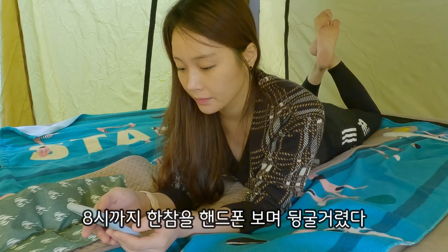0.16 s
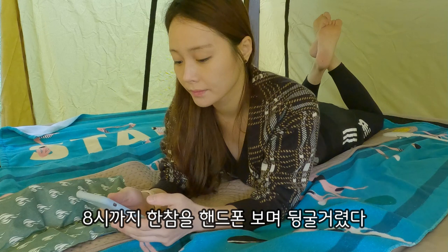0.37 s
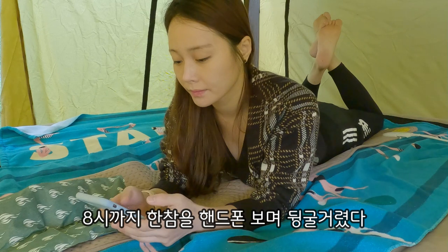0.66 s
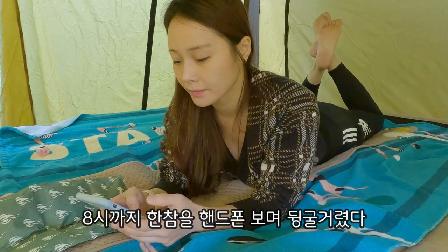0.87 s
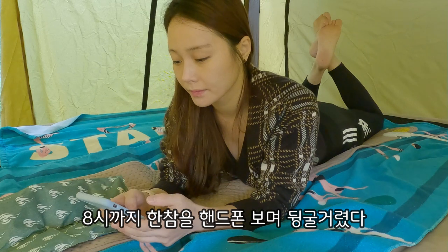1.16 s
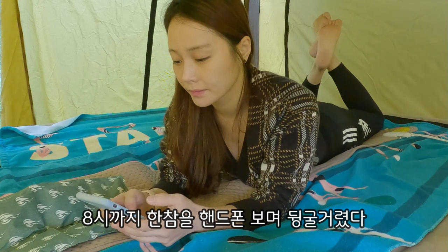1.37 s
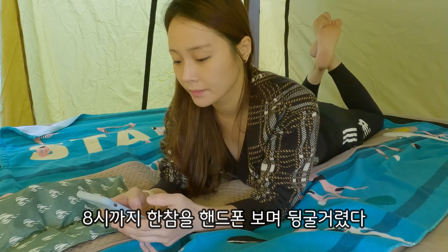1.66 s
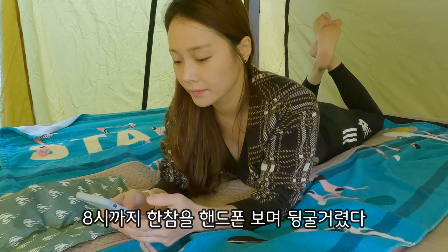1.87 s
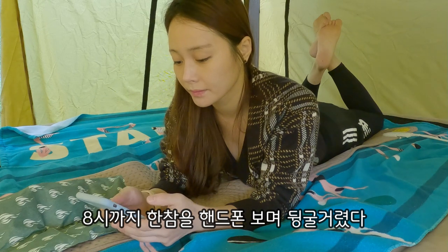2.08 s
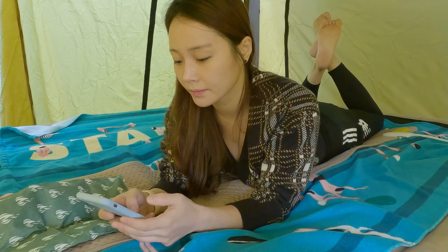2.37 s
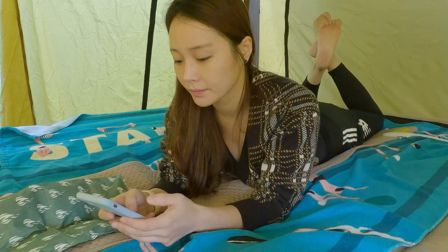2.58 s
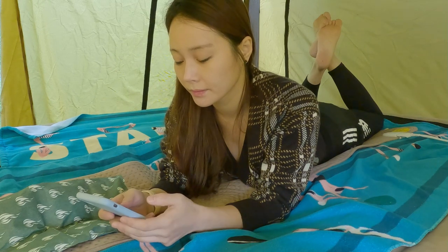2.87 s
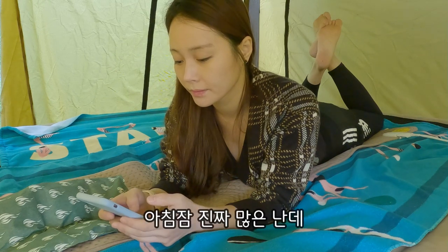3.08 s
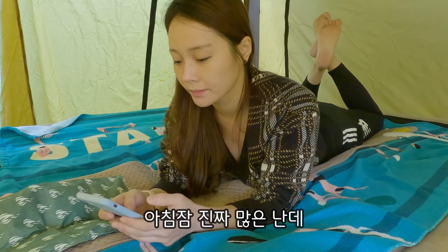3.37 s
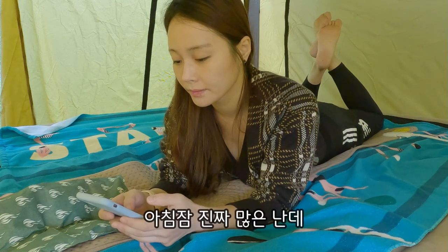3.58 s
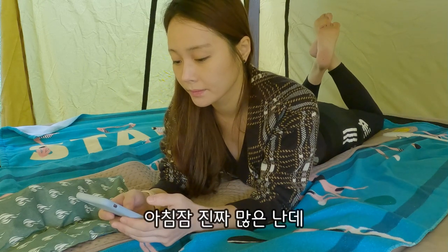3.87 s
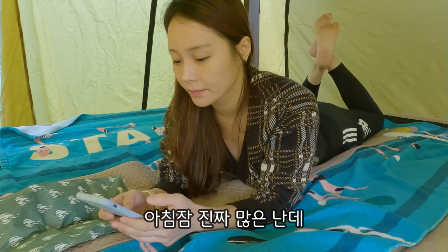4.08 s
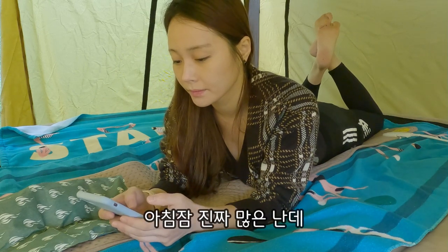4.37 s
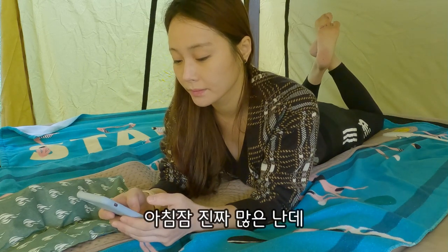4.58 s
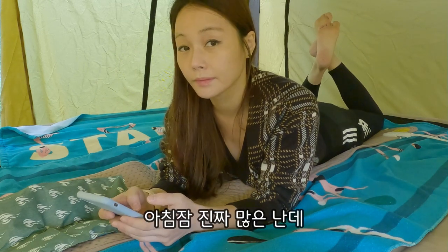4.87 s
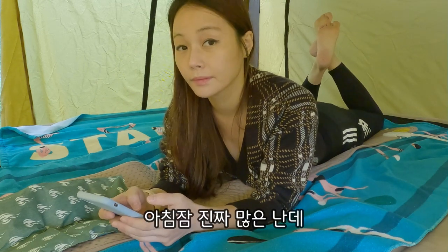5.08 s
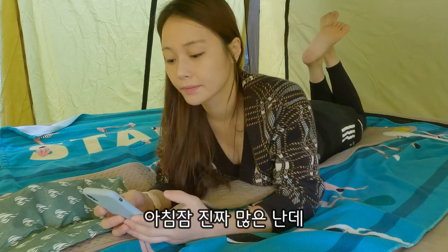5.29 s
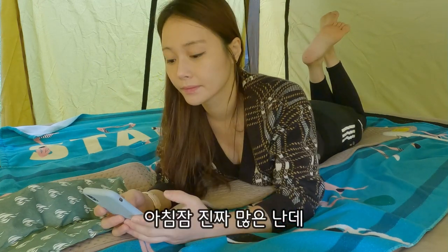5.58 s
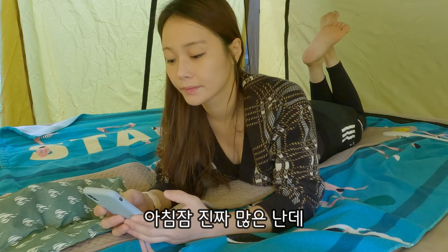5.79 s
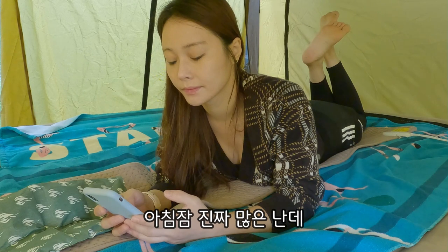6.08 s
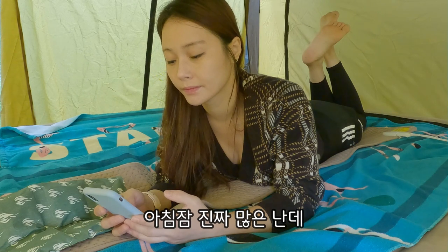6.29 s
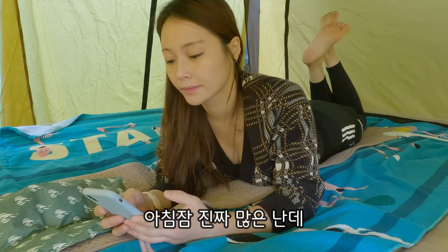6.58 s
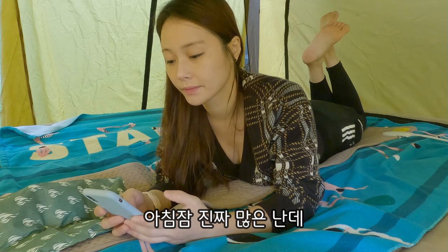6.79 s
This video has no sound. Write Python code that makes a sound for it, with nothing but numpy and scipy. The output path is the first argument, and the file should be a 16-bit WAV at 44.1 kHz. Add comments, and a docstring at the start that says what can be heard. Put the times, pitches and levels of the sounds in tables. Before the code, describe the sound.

A small bird gives eleven short, high, arched chirps among trees, over soft wind rumble and a distant rush, heard from inside a tent.

```python
"""Among trees, heard from inside a tent: a small bird gives eleven arched chirps, whistled on a gliding pitch
with noise around it and scattered by the leaves. A second bird adds two faint notes, ringing from farther off.
A hoarse far call, noise around a sinking pitch, opens the scene and stops abruptly; thin far tones swell later.
Shaped noise makes the soft wind rumble, low drone, distant rush and hiss, and the bedding, which shifts twice
near the end."""
import sys
import numpy as np
from scipy import signal
from scipy.fft import rfft, irfft, next_fast_len
from scipy.io import wavfile
from scipy.ndimage import uniform_filter1d, map_coordinates

SR = 44100
rng = np.random.default_rng(int(sys.argv[2]) if len(sys.argv) > 2 else 0)


def generate_wav(sig):
    """Save sig (samples, or channels by samples) to the path in sys.argv[1] as 16-bit PCM at SR."""
    pcm = np.round(np.clip(np.atleast_2d(sig).T, -1, 1) * 32767).astype(np.int16)
    wavfile.write(sys.argv[1], SR, pcm)


N = 306436  # samples
TIME = np.arange(N) / SR  # s


def amp(db):
    """Decibels to gain."""
    return 10 ** (np.asarray(db) / 20)


def unit(x):
    """Scale to rms 1."""
    return x / np.sqrt(np.mean(x ** 2) + 1e-20)


def curves(rows):
    """One value per sample for each column after the time."""
    s, *cols = np.transpose(rows)
    return [np.interp(TIME, s, c) for c in cols]


def wobble(rate, size=N):
    """A smooth random curve, rate knots a second."""
    knots = rng.standard_normal(size // 8)
    return map_coordinates(knots, [np.arange(size) * rate / SR], mode="mirror")


def filtered(x, response):
    """x times a response of frequency."""
    m = next_fast_len(x.shape[-1] + 8192)
    spectrum = rfft(x, m) * response(np.fft.rfftfreq(m, 1 / SR))
    return irfft(spectrum, m)[..., :x.shape[-1]]


def noise(spectrum, size=N):
    """Noise of rms 1 with the colour of the (frequency [Hz], relative level [dB]) points."""
    f, db = np.transpose(spectrum)
    white = rng.standard_normal(size)
    return unit(filtered(white, lambda hz: amp(np.interp(np.log(hz + 1), np.log(f), db))))


def add(track, s, x):
    """Mix x into the track from time s."""
    part = track[round(s * SR):][:len(x)]
    part += x[:len(part)]


def cycles(hz):
    """Running phase of a moving pitch."""
    return 2 * np.pi * np.cumsum(hz) / SR


# The small bird's chirps: (time [s], nominal length [s], shoulder pitch [Hz], top pitch [Hz],
# level of the rise [dB], level of the fall [dB], harshness [0-1], echo from the leaves re direct [dB])
CHIRP_ROWS = [ (0.676, 0.15, 3944, 5210, -36.5, -55, 0.89, 0),
              (0.941, 0.16, 4155, 5676, -37.5, -47, 0.89, 1.5),
              (1.415, 0.16, 4500, 5330, -35.5, -38.5, 0.57, 0.5),
              (1.527, 0.16, 4344, 5330, -38.5, -40, 0.95, -1.5),
              (2.101, 0.17, 4455, 5560, -41, -42, 0.28, -2.5),
              (2.541, 0.16, 4427, 5590, -41, -42, 0.3, -2.5),
              (3.242, 0.16, 4400, 5440, -41.5, -45, 0.2, -5),
              (3.636, 0.165, 3900, 5130, -41, -38.5, 0.4, -2),
              (3.993, 0.16, 4450, 5590, -40.5, -44, 0, -5.5),
              (4.311, 0.169, 4400, 5760, -50.5, -52.5, 0.05, -1),
              (4.699, 0.17, 4080, 5420, -44.5, -42.5, 0.32, -3)]


def bird(lead_s=0.017, lead_hz=4500, lead_db=-19):
    """Every chirp is led in by a tiny scratchy note, and each scatters anew among the trees."""
    out = np.zeros(N)
    for s, length, shoulder, top, rise_db, fall_db, harsh, echo_db in CHIRP_ROWS:
        call = chirp(length, shoulder, top, rise_db, fall_db, harsh)
        add(out, s, trees(call, echo_db))
        # the lead-in is loudest just as the chirp begins
        n = int(2 * lead_s * SR)
        scratchy_hz = lead_hz * (1 + 0.103 * wobble(1226, size=n))
        lead = np.hanning(n) * np.sin(cycles(scratchy_hz))
        add(out, s - lead_s, trees(np.sqrt(2) * amp(rise_db + lead_db) * lead, echo_db))
    return out


# Colour of the breathy noise around the whistle: (frequency [Hz], relative level [dB])
HOARSE_COLOUR = [(700, -26), (1500, 4.5), (2500, -5), (4300, 9), (5800, -3.5), (6600, -8.5), (8000, -15),
                 (12000, -28), (15500, -45)]
# what harshness does to a chirp: (pure, harshest)
ATTACK_S = (0.012, 0.037)  # a harsh chirp swells more slowly
TOP_SAG_DB = (9.5, 2)  # and holds its level over the top of the arch
HOARSE_DB = (-16, -11)  # with more noise around the whistle
WAVER = (0.014, 0.029)  # and a less steady pitch (share of the pitch)
ATTACK_DEPTH_DB = 20.5  # a chirp starts this far under its full level
FULL_EFFORT_DB, HOARSE_GROWTH = -38, 0.29  # growth: extra dB of hoarseness per dB of effort


def chirp(length, shoulder, top, rise_db, fall_db, harsh, flutter_db=2.0, octave_db=-31, rasp_db=-17):
    """One whistle leaps to a shoulder, climbs to a rounded top and drops; it is loudest on the slopes."""
    attack_s = np.interp(harsh, [0, 1], ATTACK_S)
    sag_db = np.interp(harsh, [0, 1], TOP_SAG_DB)
    hoarse_db = np.interp(harsh, [0, 1], HOARSE_DB)
    waver = np.interp(harsh, [0, 1], WAVER)
    t = np.arange(int(1.05 * length * SR)) / SR
    u, n = t / length, len(t)  # u: share of the nominal length

    arch_u = [0, 0.03, 0.08, 0.17, 0.3, 0.45, 0.56, 0.66, 0.74, 0.81, 0.9, 0.99, 1.05]
    arch_hz = [2250, 3250, 0.9 * shoulder, shoulder, 0.55 * shoulder + 0.45 * top, 0.92 * top,
               0.99 * top, top, 0.94 * top, 4200, 3600, 3000, 2100]
    pitch = uniform_filter1d(np.interp(u, arch_u, arch_hz), size=200)
    phase = cycles(pitch * (1 + waver * wobble(420.2, size=n)))

    top_db = rise_db - sag_db
    effort_db = [rise_db, top_db, top_db - 1.0, fall_db + 2.0, fall_db - 5.0, fall_db - 20.0]
    effort = np.interp(u, [0.3, 0.45, 0.72, 0.81, 0.92, 1.05], effort_db)
    level = effort - ATTACK_DEPTH_DB * np.maximum(1 - t / attack_s, 0)

    # a rasp thickens the whistle; its rough octave grows with harshness and sinks below full effort
    slack_db = np.maximum(FULL_EFFORT_DB - level, 0)
    octave = harsh * amp(octave_db - slack_db) * wobble(1100, size=n) * np.sin(2 * phase)
    rasp = amp(rasp_db) * wobble(1400, size=n) * np.cos(phase)
    voice = np.sin(phase) + rasp + octave
    whistle = np.sqrt(2) * voice * amp(level + flutter_db * wobble(219.3, size=n))

    # relative to the effort, the voice is hoarsest as it starts and as it drops
    course_db = np.interp(u, [0, 0.07, 0.25, 0.55, 0.85, 1.05], [-8.0, 0.5, -1.5, -14, -4.5, 24.0])
    hoarse = effort + hoarse_db + HOARSE_GROWTH * (effort - FULL_EFFORT_DB) + course_db
    return whistle + amp(hoarse) * noise(HOARSE_COLOUR, size=n)


def trees(x, echo_db, near_db=-2, near_s=0.016, t60=0.35, far_db=-17, far_t60=1.26):
    """The direct sound, a few bounces off ground and tent, then diffuse scatter from swaying leaves."""
    x = np.pad(x, (0, SR))
    path = np.zeros(SR // 10)
    delay, sign = rng.uniform(size=(2, 20))
    arrival = ((0.000991 + near_s * delay) * SR).astype(int)
    np.add.at(path, arrival, amp(near_db) * np.sign(sign - .5) / np.sqrt(len(delay)))
    path[0] = 1  # the direct sound
    near = unit(signal.fftconvolve(x, path)[:len(x)]) * np.std(x)
    # the leaves keep the energy of each band and lose its phase
    _, t, z = signal.stft(x, SR, nperseg=256)
    fade = amp(-60 * t / t60) + amp(far_db - 60 * t / far_t60)
    decay = fade * (1 - np.exp(-t / 0.0043))
    energy = np.abs(signal.fftconvolve(np.abs(z) ** 2, decay[None] ** 2, axes=1))[:, :len(t)]
    grain = signal.stft(rng.standard_normal(len(x)), nperseg=256)[2]
    scatter = signal.istft(np.sqrt(energy) * grain, nperseg=256)[1][:len(x)]
    scatter = unit(scatter) * np.std(x)
    return (near + amp(echo_db) * scatter) / np.hypot(1, amp(echo_db))


# The second bird, farther off; the last two rows overlap as one note:
# (time [s], length [s], pitch [Hz], level before octave and echo [dB], rasp [0-1])
NOTE_ROWS = [(1.239, 0.09, 3536, -54.5, 0.04), (5.28, 0.062, 3610, -56, 0.2),
             (5.311, 0.04, 4220, -57, 0.06)]


def second_bird(octave_db=-14, echo_db=-5, echo_t60=0.45):
    """Short level notes, clean or raspy, that ring on from farther off."""
    out = np.zeros(N)
    t = np.arange(SR // 2) / SR
    for s, length, hz, db, rasp in NOTE_ROWS:
        n = int(length * SR)
        phase = cycles(hz * (1 + rasp * wobble(1500, size=n)))
        voice = np.sin(phase) + amp(octave_db) * np.sin(2 * phase)
        note = amp(db) * voice * signal.windows.tukey(n, .5)
        ring = rng.standard_normal(len(t)) * amp(-60 * t / echo_t60)
        path = amp(echo_db) * unit(ring) / np.sqrt(len(t))
        path[0] = 1  # the direct sound
        add(out, s, signal.fftconvolve(note, path))
    return filtered(out, lambda hz: 1 / (1 + (hz / 7500) ** 10))


# The hoarse far call: (time [s], level [dB])
FAR_CALL_LEVEL = [(0, -47), (0.12, -47), (0.24, -45), (0.31, -48), (0.364, -50.5), (0.375, -84.5)]
FAR_CALL_HZ = (1261, 1068)  # its centre at the start and at the end


def far_call(width_hz=240, steepness=2.53):
    """A hoarse band, blurred by distance, sinks a little and stops abruptly."""
    db, = curves(FAR_CALL_LEVEL)
    white = rng.standard_normal((2, N))
    blur = filtered(white, lambda hz: 1 / np.sqrt(1 + (hz / width_hz) ** (2 * steepness)))
    phase = cycles(np.interp(TIME, [0, FAR_CALL_LEVEL[-1][0]], FAR_CALL_HZ))
    # two slow noises carried a quarter cycle apart make one band around the centre
    return amp(db) * unit(blur[0] * np.cos(phase) + blur[1] * np.sin(phase))


# Thin far tones: (time [s], length [s], pitch [Hz], level before wavering [dB])
FAR_TONE_ROWS = [(2.497, 0.19, 801.6, -61.5), (2.751, 0.83, 881, -63.5), (3.2, 1.63, 761.5, -67),
                 (5.352, 1.04, 1028, -65.5)]


def far_tones(waver=0.030034):
    """Blurred, wavering tones swell out of the rush and sink back."""
    out = np.zeros(N)
    for s, length, hz, db in FAR_TONE_ROWS:
        n = int(length * SR)
        pitch = hz * (1 + waver * wobble(40.315, size=n))
        tone = np.sin(cycles(pitch)) * wobble(130, size=n)
        add(out, s, np.sqrt(2) * amp(db) * tone * signal.windows.tukey(n, .5))
    return out


# Bedding shifts, inside the tent: (time [s], length [s], level at the peak [dB])
SHIFT_ROWS = [(5.659, 0.0883, -47), (6.222, 0.15, -48.5), (6.334, 0.25, -48)]
# Colour of the moving cloth: (frequency [Hz], relative level [dB])
CLOTH_COLOUR = [(60, -39), (150, 3.5), (220, 2), (310, -8.5), (500, -24.5), (900, -21), (2000, -38),
                (8000, -58.5)]


def bedding():
    """Soft, dull swells of moving cloth."""
    swell = np.zeros(N)
    for s, length, db in SHIFT_ROWS:
        add(swell, s, amp(db) * np.hanning(int(length * SR)))
    return swell * noise(CLOTH_COLOUR)


# Puffs of wind: (time [s], length [s], level at the peak [dB])
PUFF_ROWS = [(0.407, 0.2, -47), (0.688, 0.15, -43.5), (1.037, 0.17, -43.5), (1.265, 0.69, -42.5),
             (2.262, 0.12, -43.5), (3.107, 0.16, -40.5), (3.243, 0.12, -45), (3.553, 0.25, -49),
             (4.854, 0.12, -49), (5.122, 0.12, -48)]
# Colour of the wind rumble: (frequency [Hz], relative level [dB])
RUMBLE_COLOUR = [(10, -14.5), (25, 0), (45, -3.5), (64, 2), (90, -9), (125, -8), (200, -28.5), (400, -67)]
BREEZE_DB, LUMPS_DB, LUMPS_PER_S = -54, 2.5, 12  # the rumble between the puffs and its unevenness
LULL_S, LULL_DB = (5.34, 5.66), -6.5  # the breeze drops over this time, by this much


def wind():
    """A lumpy breeze that drops near the end; each puff swells and dies on top of it."""
    lumps = unit(amp(LUMPS_DB * wobble(LUMPS_PER_S)))
    breeze = amp(BREEZE_DB + np.interp(TIME, LULL_S, [0, LULL_DB])) * lumps
    puffs = np.zeros(N)
    for s, length, db in PUFF_ROWS:
        add(puffs, s, amp(db) * np.hanning(int(length * SR)))
    return np.hypot(breeze, puffs) * noise(RUMBLE_COLOUR)


# Colour of the low drone, far off: (frequency [Hz], relative level [dB])
DRONE_COLOUR = [(70, -33), (115, -13.5), (145, -0.5), (185, 1.5), (225, -3.5), (260, -16), (400, -21.5),
                (700, -24.5), (1500, -59.5)]
# Colour of the distant rush: (frequency [Hz], relative level [dB])
RUSH_COLOUR = [(250, -16), (500, -16), (850, -8.5), (1020, -1), (1300, 1.5), (1600, -4.5), (2000, -14.5),
               (2600, -28), (4000, -50)]
# Colour of the leaves and microphone hiss: (frequency [Hz], relative level [dB])
HISS_COLOUR = [(1200, -13), (2400, -6), (3200, -6.5), (4000, -6.5), (4900, 0), (5600, -3), (6200, -3),
               (7000, -11), (8000, -20), (10000, -21.5), (11300, -18), (11900, -12.5), (12600, -24),
               (15600, -31)]
DRONE_DB, DRONE_SWAY_DB = -54.5, 0.85
RUSH_DB, RUSH_FADE_DB_PER_S = -54.5, 0.5158  # level at the start; it slowly recedes


def outdoors(rush_sway_db=1.5, hiss_db=-69.0):
    """A nearly steady distant drone, a receding rush and an even hiss."""
    drone = amp(DRONE_DB + DRONE_SWAY_DB * wobble(3.03)) * noise(DRONE_COLOUR)
    rush_db = RUSH_DB - RUSH_FADE_DB_PER_S * TIME + rush_sway_db * wobble(5)
    rush = amp(rush_db) * noise(RUSH_COLOUR)
    hiss = amp(hiss_db) * noise(HISS_COLOUR)
    return drone + rush + hiss


def scene():
    """Everything sits in the middle; only the thinnest hiss differs between the ears."""
    mid = bird() + second_bird() + far_call() + far_tones() + bedding() + wind() + outdoors()
    # (frequency [Hz], relative level [dB])
    side_colour = [(100, -29.5), (400, -4), (1500, -17), (4000, -16), (8000, -4.0),
                   (10500, -0.5), (11900, 6.5), (13000, 0.5), (15500, -1)]
    side = amp(-84.0) * noise(side_colour)
    return np.array([mid + side, mid - side])


def record(dry, top_hz=15720):
    """The recorder keeps nothing at or above its band limit."""
    return filtered(dry, lambda hz: hz < top_hz)


dry = scene()
out = record(dry)
generate_wav(out)
```